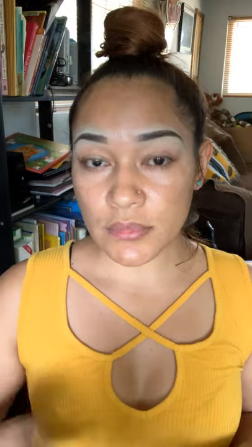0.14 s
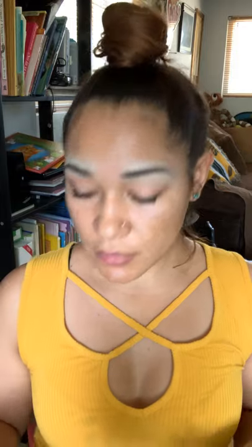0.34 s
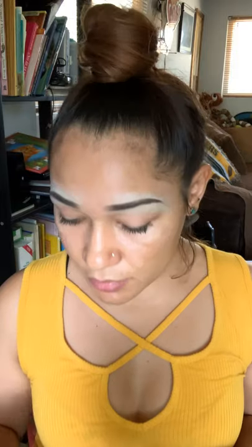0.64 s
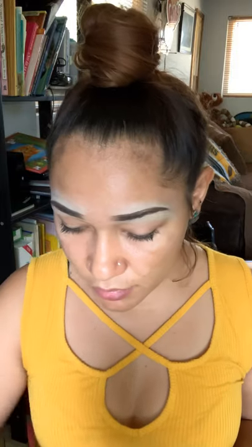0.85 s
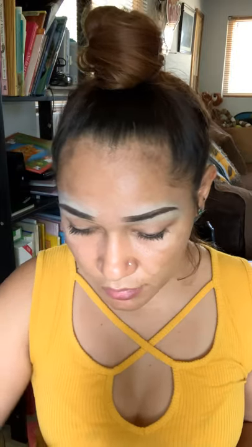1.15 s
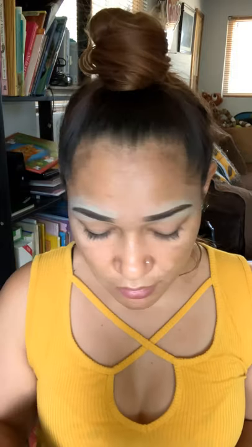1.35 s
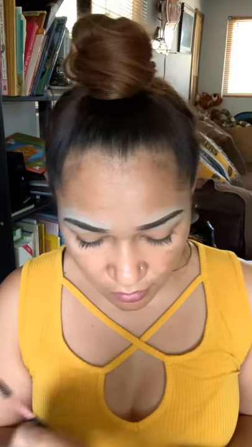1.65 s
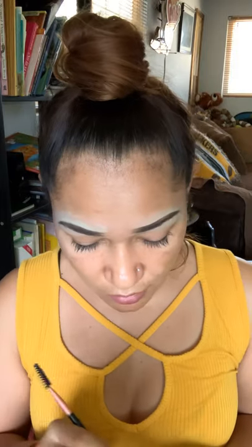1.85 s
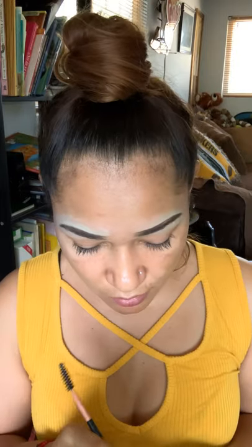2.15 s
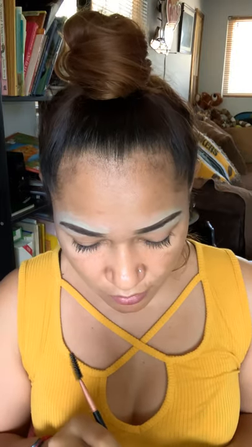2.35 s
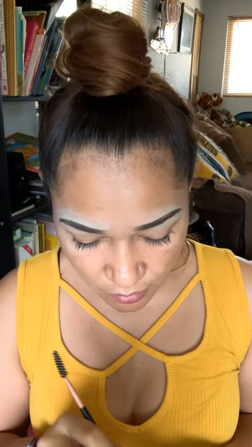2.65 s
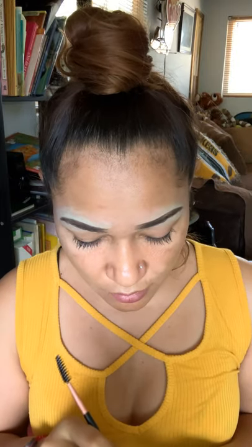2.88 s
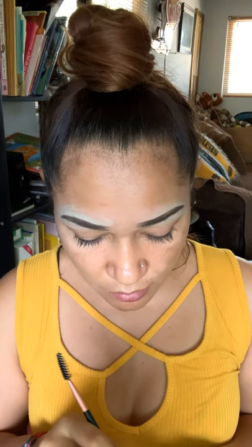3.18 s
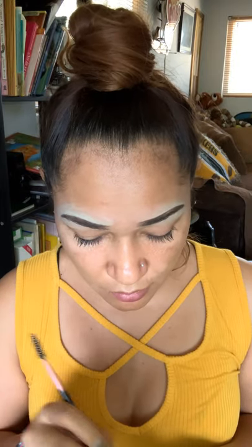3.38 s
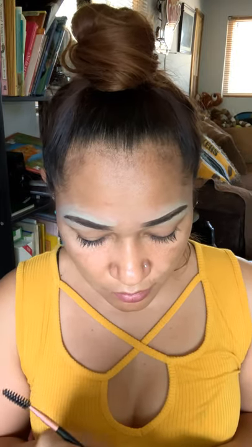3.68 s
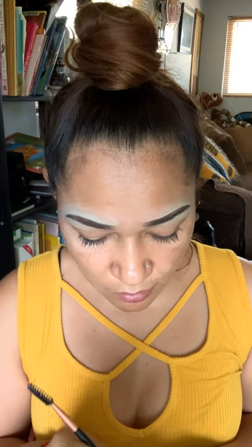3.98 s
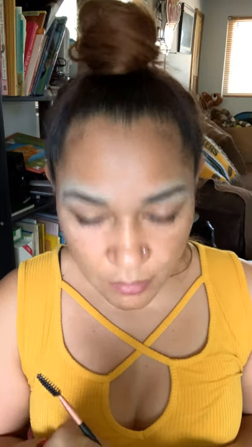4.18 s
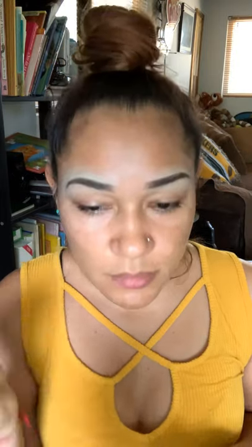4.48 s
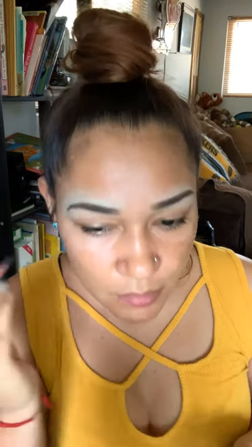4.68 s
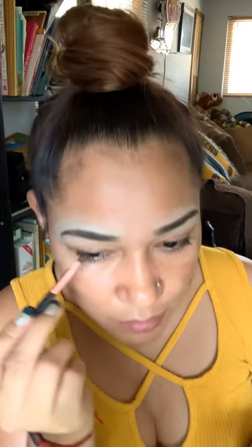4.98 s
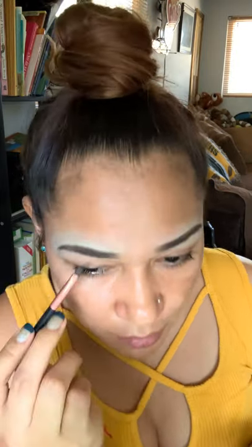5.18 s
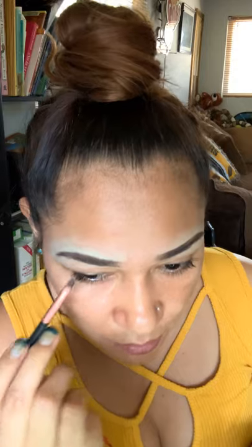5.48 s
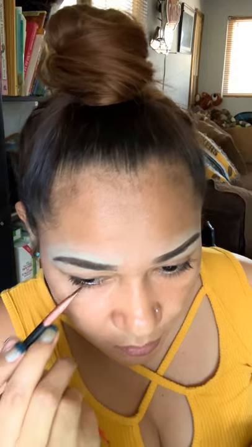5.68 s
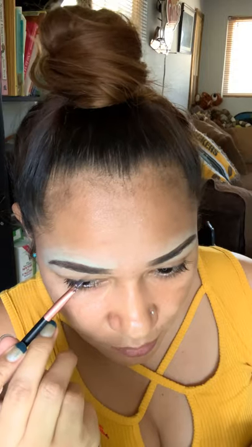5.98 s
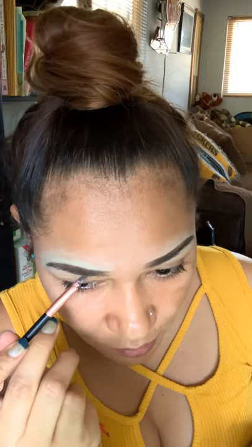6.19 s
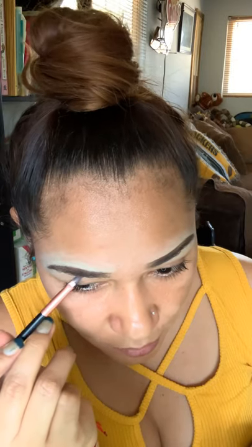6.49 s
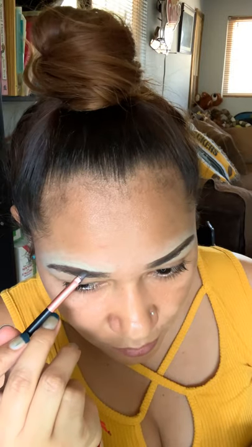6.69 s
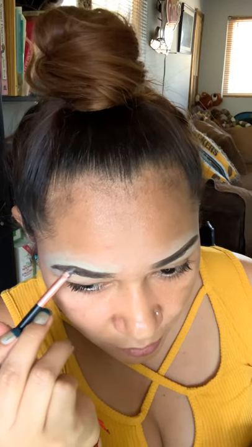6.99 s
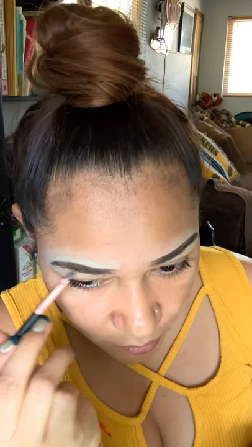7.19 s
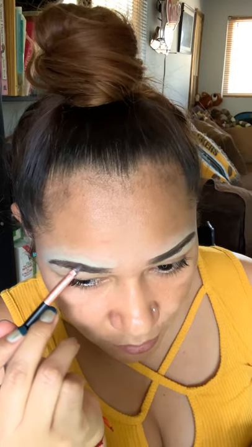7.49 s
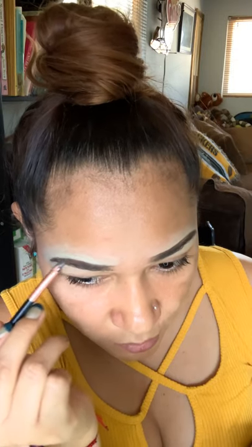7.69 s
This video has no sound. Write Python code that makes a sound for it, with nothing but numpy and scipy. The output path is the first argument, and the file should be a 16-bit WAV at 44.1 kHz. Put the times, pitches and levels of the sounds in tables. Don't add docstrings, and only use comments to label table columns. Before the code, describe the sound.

Light makeup clutter in a quiet room: one sharp snap, gritty sliding, bursts of plastic and glass clicks, then faint brush strokes and ticks.

```python
import sys
import numpy as np
from scipy import signal
from scipy.fft import rfft, irfft
from scipy.io import wavfile
from scipy.ndimage import uniform_filter1d

SR = 44100
rng = np.random.default_rng(int(sys.argv[2]) if len(sys.argv) > 2 else 0)


def wav_record(signal):
    frames = np.transpose(np.atleast_2d(signal))
    bounded = np.clip(frames, -1, 1)
    quanta = np.round(bounded * 32767).astype(np.int16)
    wavfile.write(sys.argv[1], SR, quanta)


def gain_from_decibels(decibels):
    exponent = np.asarray(decibels, float) / 20
    return 10 ** exponent


N = 345744

# pitch_hz, level_db per Hz
ROOM_RUMBLE = [(30, -35), (50, 6), (80, -7.5), (160, -8.5), (250, -4), (630, -13), (1400, -24.5),
               (2300, -48)]
# pitch_hz, level_db
HUM_LINES = [(108, -70), (118.4, -66), (188.4, -68.5), (242.2, -60.5), (419.9, -65), (602.9, -69)]
# time_s, level_db
FAR_TRAFFIC = [
    (0.0, -66),
    (1.16, -63.5),
    (2.93, -57.5),
    (3.97, -60),
    (4.39, -61),
    (5.9, -66.5),
    (6.2, -66),
    (7.84, -67.5),
]
# time_s, lift_db, half_length_s
FLOOR_THUDS = [(3.343, 5, 0.067), (4.61, 8, 0.08), (2.33, 5.5, 0.1), (7.05, 7, 0.06), (5.19, 8, 0.07),
               (6.24, 8, 0.04), (2.55, 5, 0.05)]
# pitch_hz, level_db per Hz
MIC_HISS_DB = [(2000, -36.5), (8000, -49.5), (13500, -59), (14500, -74)]
# pitch_hz, t60_s
ROOM_DECAY = [(400, 0.28), (1000, 0.46), (2000, 0.39), (3500, 0.44), (7000, 0.41), (14000, 0.27)]

# time_of_most_pressure_s, press_s, release_s, level_db, centre_hz
BRISTLE_STROKES = [(0.205, 0.02, 0.12, -77, 3850), (0.27, 0.052, 0.08, -80, 2750),
                   (3.09, 0.1, 0.119, -64, 1200), (0.48, 0.085, 0.052, -83, 3530),
                   (5.526, 0.07, 0.077, -80, 4000), (5.92, 0.13, 0.2, -72.5, 3460),
                   (5.9, 0.08, 0.08, -74.5, 5400), (6.13, 0.066, 0.05, -77, 5000),
                   (6.42, 0.08, 0.1, -85, 6000), (6.99, 0.08, 0.1, -71, 6200),
                   (6.081, 0.037, 0.099, -74.5, 3100), (6.36, 0.05, 0.29, -79, 2900),
                   (6.55, 0.15, 0.13, -74.5, 4000), (7.149, 0.1, 0.2, -71, 4100),
                   (7.33, 0.082, 0.23, -73, 4000)]
# time_of_most_pressure_s, press_s, release_s, body_level_db, treble_db
SLIDE_STROKES = [(0.03, 0.097, 0.11, -60, -2.5), (0.502, 0.18, 0.11, -74, -4), (0.72, 0.1, 0.12, -84, 21),
                 (0.885, 0.12, 0.12, -63, -0.5), (1.046, 0.35, 0.2, -55, 4), (1.254, 0.02, 0.18, -52.5, -6),
                 (1.35, 0.13, 0.027, -52.5, 6.5), (1.8, 0.27, 0.25, -67, 1),
                 (1.858, 0.021, 0.15, -57.5, -3), (2.24, 0.1, 0.15, -72, -8.5), (3.01, 0.018, 0.3, -68, -4),
                 (3.1, 0.15, 0.41, -59, -2.5), (6.85, 0.03, 0.17, -65, -4), (7.0, 0.12, 0.14, -77, 11.5),
                 (7.045, 0.04, 0.15, -66, 3)]
# pitch_hz, level_db per Hz
SLIDE_BODY = [(150, -25.5), (250, -10.5), (380, -7), (597, -11), (816, -5.5), (4000, -21), (5200, -41),
              (8800, -120)]
# pitch_hz, level_db per Hz
SLIDE_HISS = [(2350, -129), (4000, -6.5), (4730, 2), (5670, 1.5), (8360, -10), (10700, -17), (16000, -23.5)]

# pitch_hz, level_db
CRACK_COLOUR = [(250, -52), (600, -25), (1200, -15), (2200, -17), (4000, -18.5), (6500, -24), (9000, -34.5),
                (15000, -47.5)]
# (start_s, peak_db, treble_db, contact_ms)
SNAP_LID = ([(1000, 200, -11), (1550, 400, -2), (2100, 600, 2), (3000, 600, -6), (3660, 400, -4),
             (4500, 900, -3), (5690, 800, -2.5), (6700, 350, 0), (8000, 1300, -9), (10100, 800, -7),
             (11300, 900, -10), (12850, 300, -8), (14000, 500, -12)], (-10, 3), [(0.525, -9.5, -12, 1.1),
             (0.534, -26, -23.5, 1), (0.552, -31, -42, 0.8), (0.581, -33, -28, 1.1), (0.573, -38, -28, 1),
             (0.593, -39, -28, 1), (0.506, -62, -5, 1)])
SMALL_CASE = ([(1162, 150, 8.7), (1650, 290, 5.8), (2086, 98, 7.4)], (2.9, 10), [(1.252, -36, -32, 3),
               (1.309, -36, -7, 2.7), (1.32, -33, -18, 6)])
HARD_TRAY = ([(654, 79, 7), (900, 370, 8.5), (1380, 1060, 1), (1640, 160, 4.5), (2090, 90, 15),
              (2860, 300, 5), (3650, 250, -6), (7050, 500, -10), (7850, 500, -10), (9400, 500, -13)],
              (4.7, 2.5), [(1.358, -20, -11.5, 1.65), (1.397, -23.5, -10.5, 1.1), (1.418, -33.5, -16, 2.1)])
MAKEUP_PENCIL = ([(875, 170, 7.5), (1053, 270, 8.5), (1871, 530, 4), (3140, 670, -5)], (1.8, 3),
                  [(0.609, -36.5, -25, 3), (1.855, -40, -25, 1.6), (2.179, -55.5, -6, 2.1),
                  (2.334, -56, -28, 2.3), (2.358, -47, -40, 3), (2.426, -38.5, -44, 2.5)])
CREAM_POT = ([(576, 300, -17), (985, 130, 0.5), (1850, 670, -2.5), (2330, 170, 7), (3360, 90, -2),
              (4080, 160, -6), (5400, 360, -4.5), (6500, 260, -12.5)], (0.67, 7.6), [(2.451, -15, -16, 2.6),
              (2.474, -22, -19, 2.9), (2.503, -28, -16, 4)])
BRUSH_HANDLE = ([(1950, 340, 14), (2250, 100, 15), (3340, 320, 10.7), (5800, 370, 7), (7670, 410, 3)],
                 (3.8, 1.2), [(3.244, -36.5, -8.5, 1.2)])
JAR_RIM = ([(910, 880, -0.5), (1700, 900, 1.5), (2770, 610, 5), (4780, 440, -11), (6380, 900, -16)],
            (1, 10.4), [(3.376, -31, -17, 2.5), (3.39, -24.5, -11.5, 2.5), (3.673, -41.5, -28, 30),
            (2.761, -46, -35, 1.5), (0.621, -50, -25, 2)])
PLASTIC_CUP = ([(1035, 900, -17), (1913, 160, 6), (2225, 275, 1.5), (2750, 270, -5), (3320, 600, -8),
                (5320, 600, -8.5), (6430, 360, -7)], (1.32, 1.1), [(4.067, -32.5, -17.5, 1.15),
                (4.071, -26.5, -14, 3.6), (4.089, -30, -26, 1.6), (4.102, -35.5, -24.5, 2),
                (4.124, -42.5, -29, 2.3)])
SCREW_JAR = ([(920, 330, -19), (1860, 200, -15), (2224, 175, 2.5), (3380, 270, -11.5), (5120, 600, -7),
              (1450, 500, -10), (8000, 1200, -14)], (-2, -5.5), [(4.479, -17.5, -18, 2),
              (4.506, -25, -5, 0.99), (4.519, -18.5, -12, 2.5), (4.488, -21.5, -30, 1.3),
              (4.499, -25.5, -27, 1.8), (4.511, -22, -28, 1.5), (4.627, -28, -28, 2)])
POWDER_COMPACT = ([(474, 230, -19), (1290, 120, 3), (800, 500, -24), (1700, 400, -12), (2230, 130, 4),
                   (2430, 180, 2), (2750, 350, -4), (4400, 500, -19), (3400, 600, -12), (5550, 500, -14),
                   (6360, 400, -14)], (-2.5, -4), [(4.38, -14, -15, 3), (4.395, -24, -28, 2),
                   (4.443, -25.5, -25, 2.2), (4.413, -25.5, -17.5, 2.3), (4.376, -32, -20, 3),
                   (4.404, -24, -25, 2.5), (4.428, -29, -25, 3), (4.458, -30, -25, 3)])
HOLLOW_BOX = ([(491, 74, 5.5), (848, 138, 9), (1174, 470, 2.5), (1870, 1100, 3.5), (3004, 85, 3),
               (4880, 900, -19.5), (6200, 700, -7)], (0.68, 2.3), [(4.481, -33, -32.5, 21),
               (4.525, -19, -9.5, 6.3), (4.546, -22.5, -17.5, 6.8), (4.561, -31, -12, 4.4),
               (4.632, -36, -11, 19)])
STIFF_TUBE = ([(920, 870, -11.5), (1617, 140, 2), (1878, 93, 12), (2200, 120, 6), (3310, 270, -9),
               (3830, 830, -11.5), (4900, 900, -13), (5900, 700, -9), (6930, 700, -5), (8000, 500, -16),
               (10300, 900, -15), (11400, 500, -22)], (0, -6), [(4.872, -26, -15, 1.6),
               (4.895, -37, -12, 5.4)])
CASE_CLASP = ([(1400, 700, 2), (1790, 310, 3), (2050, 120, -7), (3260, 250, -6), (6600, 400, -2),
               (5600, 500, -5), (8000, 400, -10)], (3.4, -1), [(5.118, -57, -8, 4.2),
               (5.128, -42.5, -15, 2.5), (5.174, -44.5, -12, 6.9), (5.231, -42, -22, 3.2)])
TUBE_CAP = ([(1368, 1360, -8), (1790, 61, 9.5), (1910, 110, 5), (3650, 400, -10), (5400, 500, -11),
             (6800, 500, -10)], (2.6, 4), [(6.277, -33, -26.5, 4), (6.298, -38.5, -29, 3.3),
             (6.318, -47, -33, 2)])
PENCIL_NIB = ([(1430, 640, -7.5), (2100, 220, 5), (3300, 200, -4.5), (5900, 600, -3), (6900, 500, -6)],
               (3.5, 1), [(6.164, -36, -25.5, 2.8), (6.187, -40.5, -19, 2), (6.206, -52, -21, 1.8)])
THIN_STICK = ([(825, 430, 1.5), (1500, 480, 1), (1910, 90, 12), (2270, 90, 16), (2600, 350, -3),
               (4070, 200, -9), (5570, 270, -5.5), (6420, 270, -3), (7840, 450, -13)], (4.5, -9),
               [(6.779, -44, -7, 1.8), (6.793, -48, -2, 2), (6.815, -46, -15, 9), (6.852, -47, -12, 9),
               (6.904, -53, -8, 4.5), (6.95, -57, -12, 15), (6.88, -52, -14, 12), (6.93, -58, -12, 12),
               (6.975, -57, -14, 12), (6.832, -47, -14, 9), (6.866, -49, -14, 9), (6.893, -53, -14, 9)])
SOLID_BLOCK = ([(850, 430, 15), (1310, 160, 19.5), (1777, 200, 12.5), (4000, 420, -6.5), (5800, 400, -8)],
                (-2.5, 0.5), [(7.033, -33.5, -16, 2.4), (7.057, -37, -12, 2.5), (7.067, -37, -23, 3.2),
                (7.046, -36, -20, 3), (7.074, -41, -23, 2)])
SOFT_PURSE = ([(392, 190, 1), (630, 63, 13), (861, 64, 13.5), (1380, 1000, 1.5), (2230, 70, 5)],
               (-0.91, 4.5), [(0.944, -41, -15, 14), (0.984, -41, -24, 7), (1.037, -36, -15, 5.3),
               (1.064, -42, -14, 9), (1.109, -40, -16, 3.5), (3.073, -51.5, -34, 9.5),
               (3.114, -55, -28, 21)])
SOFT_PAD = ([(406, 180, -2.5), (626, 160, -7)], (-2.6, -11), [(0.932, -37, -28, 1.5),
             (0.955, -42.5, -28, 6), (4.486, -33, -33, 3.2)])
GLASS_JAR = ([(940, 290, -14), (2052, 95, -2.5), (2257, 210, 7), (2760, 120, -6.5), (3440, 150, -8),
              (3940, 230, -11.5), (4930, 200, -10), (5280, 450, -6), (5820, 300, -3.5), (6830, 210, -10)],
              (0.5, -5), [(3.691, -18.5, -11.5, 1.9), (3.713, -28, -14, 1.4), (3.721, -38, -17, 0.91),
              (3.745, -32.5, -20, 2.4), (3.689, -31, -14, 1.5), (3.708, -29, -18, 1.5)])
LOOSE_RATTLE = ([(893, 400, -1), (1650, 500, 1), (2190, 600, 3.5), (2850, 700, -2.5), (4090, 520, -7.5),
                 (5800, 1200, -18.5)], (0, 2), [(-0.06, -35.5, -17.5, 5.4), (0.875, -40, -43, 6),
                 (0.901, -40, -22, 1.7), (1.011, -39, -18, 1.5), (1.04, -44, -22, 1.2),
                 (1.054, -42, -20, 1.3), (1.099, -41, -18, 1.2), (1.229, -59, -25, 2),
                 (1.275, -48, -18, 2.2), (1.362, -21, -14, 1), (1.372, -25, -21, 1.7),
                 (1.381, -33, -17, 1.1), (1.432, -42, -14, 1.7), (1.447, -45, -17.5, 1.9),
                 (2.448, -33, -14, 3.5), (2.522, -33, -3, 2), (2.539, -38, -9, 1.5), (2.548, -31, -12, 2),
                 (2.565, -28.5, -13.5, 2.6), (2.584, -34.5, -13, 2.1), (2.597, -40.5, -10, 1.7),
                 (2.613, -35, -23, 2), (4.535, -22, -16, 1.5), (4.549, -24.5, -16, 1.3),
                 (4.562, -22, -19, 1.1), (4.576, -30, -16, 1.3), (4.59, -26, -23, 2.2),
                 (4.612, -39, -8, 1.3), (4.63, -36, -16, 1.3)])
SMALL_BOTTLE = ([(1870, 150, 1), (2320, 130, 6.5), (3230, 600, -14), (4100, 500, -17), (5700, 900, -4),
                 (1000, 700, -8)], (2.2, -8), [(4.778, -40, -28, 5), (4.805, -39, -33, 3),
                 (4.826, -43, -37, 3.7), (4.846, -46, -32, 4.4)])
SMALL_VIAL = ([(942, 300, -13), (1797, 320, -11), (2320, 110, 6), (2490, 120, -1.5), (3390, 300, -9),
               (5600, 500, -10)], (-0.5, -3), [(3.415, -25.5, -14, 1.9), (3.434, -34, -33, 1.9),
               (4.022, -57, -20, 6), (4.052, -55.5, -7.5, 3)])
TABLE_MUG = ([(1060, 160, -8), (1500, 500, -7), (1950, 140, 6), (2300, 250, 3), (2700, 300, -3),
              (3200, 500, -6), (5320, 600, -8.5), (6430, 360, -7), (600, 350, -11)], (2, 4),
              [(4.335, -21.5, -15.5, 2.5), (4.348, -22.5, -27, 3), (4.359, -24, -23, 2.5),
              (4.364, -30, -8, 6.9), (4.342, -30, -25, 2.5)])


def evened(x):
    return x / np.sqrt(np.mean(x ** 2) + 1e-20)


def read(points, hz):
    f, value = np.transpose(points)
    return np.interp(np.log(hz + 1), np.log(f + 1), value)


def add(mix, s, sound):
    at = round(s * SR)
    sound = sound[max(-at, 0):]
    part = mix[max(at, 0):][:len(sound)]
    part += sound[:len(part)]


def coloured(x, points):
    gain = gain_from_decibels(read(points, np.fft.rfftfreq(len(x), 1 / SR)))
    return irfft(rfft(x) * gain, len(x))


def highpassed(x, order, hz):
    return signal.sosfilt(signal.butter(order, hz, "high", fs=SR, output="sos"), x)


def air():
    size, hop = 1024, 256
    frames, hz = N // hop + 5, np.fft.rfftfreq(size, 1 / SR)
    real, imag, patches = rng.standard_normal((frames, len(hz), 3)).T
    patches = evened(uniform_filter1d(uniform_filter1d(patches, 8, 0), 14, 1))
    s, traffic_db = np.transpose(FAR_TRAFFIC)
    now = (np.arange(frames) * hop - size / 2) / SR
    bass_db = np.interp(now, s, traffic_db - traffic_db.mean())
    for at, lift_db, half_s in FLOOR_THUDS:
        bass_db = bass_db + lift_db * np.exp(-((now - at) / half_s) ** 2)
    drift_db = 1.1 * evened(uniform_filter1d(rng.standard_normal(frames), 30))
    swell_db = np.where(hz[:, None] < 150, bass_db, drift_db * (hz < 900)[:, None])
    rumble = gain_from_decibels(read(ROOM_RUMBLE, hz) - 30 * (hz > 2600))[:, None] * gain_from_decibels(swell_db)
    mic_hiss = gain_from_decibels(read(MIC_HISS_DB, hz))[:, None]
    spectrum = (real + 1j * imag) * gain_from_decibels(0.48 * patches) * np.hypot(rumble, mic_hiss)
    wash = signal.istft(spectrum, nperseg=size, noverlap=size - hop)[1][:N]
    wash = gain_from_decibels(-54.5) * evened(wash)
    t = np.arange(N) / SR
    for hum_hz, level_db in HUM_LINES:
        waver = evened(uniform_filter1d(uniform_filter1d(rng.standard_normal(N), 6000), 6000))
        wash += gain_from_decibels(level_db + 0.58 * waver) * np.sin(2 * np.pi * hum_hz * t + 0.66 * waver)
    return wash


def room_tail():
    length = SR // 2
    taps = rng.choice([-1., 1.], length) * (rng.random(length) < .15)
    hz, frame_s, z = signal.stft(taps, SR, nperseg=256)
    power = abs(z) ** 2
    lumps = evened(uniform_filter1d(uniform_filter1d(power, 5, 0), 3, 1) - np.mean(power))
    z = z * gain_from_decibels(1.2 * np.clip(lumps, -2, 2))
    decay = gain_from_decibels(-60 * frame_s / read(ROOM_DECAY, hz)[:, None])
    tail = signal.istft(z * decay, SR, nperseg=256)[1][:length]
    t = np.arange(len(tail)) / SR
    tail *= np.clip((t - .003) / 0.00043, 0, 1)
    tail *= gain_from_decibels(3 * np.exp(-t / 0.046))
    return tail / np.linalg.norm(tail)


def stroke(press, release):
    t = np.arange(-2 * press, 2 * release, 1 / SR)
    return t, gain_from_decibels(20 * np.where(t < 0, t / press, -t / release))


def bristles():
    mix = np.zeros(N)
    noise = rng.standard_normal((len(BRISTLE_STROKES), 3, SR))
    for (s, press, release, level_db, centre_hz), (a, b, patch) in zip(BRISTLE_STROKES, noise):
        t, gain = stroke(press, release)
        sinking_hz = centre_hz * (1 - 0.088 * t / (press + release))
        turn = np.exp(2j * np.pi * np.cumsum(sinking_hz) / SR)
        band = uniform_filter1d(a, 45) + 1j * uniform_filter1d(b, 45)
        band += 0.082 * (a + 1j * b) / np.sqrt(45)
        band *= gain_from_decibels(1.06 * evened(uniform_filter1d(patch, 900)))
        swish = evened((band[:len(t)] * turn[:SR]).real)
        add(mix, s + t[0], gain_from_decibels(level_db) * gain[:SR] * swish)
    return mix


def slides():
    low, high, clumps, flicker = rng.standard_normal((N, 4)).T
    caught = 1. * (rng.random(N) < 500 / SR)
    catches = 1 + gain_from_decibels(3) * uniform_filter1d(caught, size=40) * 10
    clump_gain = gain_from_decibels(1.6 * evened(uniform_filter1d(clumps, 250)))
    flicker_gain = gain_from_decibels(0.93 * evened(uniform_filter1d(flicker, 300)))
    body = gain_from_decibels(8.0) * evened(coloured(low * catches * clump_gain, SLIDE_BODY))
    hiss = gain_from_decibels(-4.0) * evened(coloured(high * catches * flicker_gain, SLIDE_HISS))
    body_power, hiss_power = np.zeros((2, N))
    for s, press, release, level_db, treble_db in SLIDE_STROKES:
        t, gain = stroke(press, release)
        add(body_power, s + t[0], (gain_from_decibels(level_db) * gain) ** 2)
        add(hiss_power, s + t[0], (gain_from_decibels(level_db + treble_db) * gain) ** 2)
    return np.sqrt(body_power) * body + np.sqrt(hiss_power) * hiss


def gritty_contact(contact_ms, t, chance):
    u = t * 1000 / np.clip(contact_ms, .1, 20)
    grit = rfft(chance * np.sqrt(u) * np.exp(-u))
    for _ in range(2):
        even = grit / (abs(grit) + 0.082 * abs(grit).mean())
        contact = irfft(even) * np.exp(-u / 8)
        grit = rfft(contact)
    return contact


def ringing(modes, treble_db, t, chance):
    ring = np.zeros((2, len(t)))
    for k, ((hz, width, db), shift) in enumerate(zip(modes, chance[::-1])):
        lift_db = (treble_db + 5.5) * (hz > 4500)
        fade = np.pi * width * t
        swell = fade * np.exp(-fade) * 2
        level = gain_from_decibels(db + lift_db) * width * np.pi / SR
        grip_hz = hz * (1 + 0.006 * shift)
        sides = np.array([[1], [(-1) ** k]])
        ring += sides * level * swell * np.sin(2 * np.pi * grip_hz * t)
    return ring


def knock(modes, peak_db, treble_db, room_db, contact_ms, crack_db, tail, chance):
    t = np.arange(4096) / SR
    contact = gritty_contact(contact_ms, t, chance)
    ring = ringing(modes, treble_db, t, chance)
    crack = gain_from_decibels(crack_db) * coloured(np.roll(contact, 12), CRACK_COLOUR) * (t < .06)
    above_4k = signal.butter(2, 4000, "high", fs=SR, output="sos")
    crack += (gain_from_decibels(treble_db + 22.0) - 1) * signal.sosfiltfilt(above_4k, crack)
    direct = signal.fftconvolve(contact[None], ring, axes=1)[:, :len(t)] + crack
    direct = highpassed(direct, 2, 260)
    direct *= gain_from_decibels(peak_db) / abs(direct[0]).max()
    echoes = irfft((rfft(direct, n=2 ** 15) * tail).sum(0)) / np.sqrt(2)
    heard = gain_from_decibels(room_db) * echoes
    add(heard, 0, direct[0])
    return heard


def objects():
    mix = np.zeros(N)
    tails = [rfft(room_tail(), n=2 ** 15) for _ in range(16)]
    things = (SNAP_LID, SMALL_CASE, HARD_TRAY, MAKEUP_PENCIL, CREAM_POT, BRUSH_HANDLE, JAR_RIM, PLASTIC_CUP,
              SCREW_JAR, POWDER_COMPACT, HOLLOW_BOX, STIFF_TUBE, CASE_CLASP, TUBE_CAP, PENCIL_NIB,
              THIN_STICK, SOLID_BLOCK, SOFT_PURSE, SOFT_PAD, GLASS_JAR, LOOSE_RATTLE, SMALL_BOTTLE,
              SMALL_VIAL, TABLE_MUG)
    for turn, (modes, (room_db, crack_db), knocks) in enumerate(things):
        chance = rng.standard_normal((32, 4096))
        for k, (s, peak_db, treble_db, contact_ms) in enumerate(knocks):
            front, behind = [tails[(5 * turn + k + side) % len(tails)] for side in (0, 7)]
            tail = np.array([front, behind])
            sound = knock(modes, peak_db, treble_db, room_db, contact_ms, crack_db, tail, chance[k])
            add(mix, s + 0.00046, sound)
    return mix


def scene():
    return (air() + bristles() + slides() + objects())[None]


def roll_off(x):
    return signal.sosfilt(signal.butter(12, 16500, fs=SR, output="sos"), x)


def record(dry):
    mix = highpassed(dry, 3, 38)
    edge = signal.firwin(255, 15900, fs=SR)
    mix = signal.oaconvolve(mix, edge[None], "same")
    return roll_off(mix)


dry = scene()
out = record(dry)
wav_record(out)
```